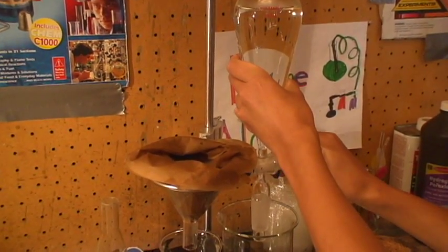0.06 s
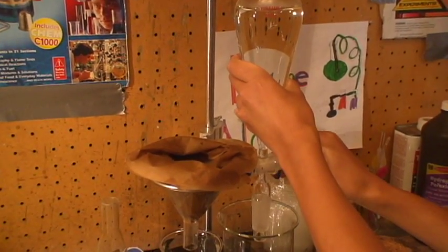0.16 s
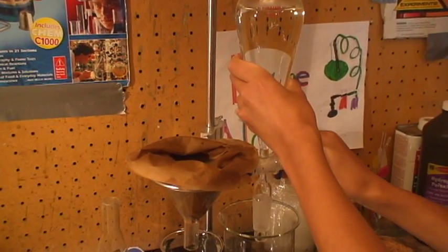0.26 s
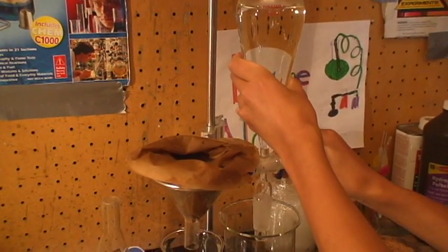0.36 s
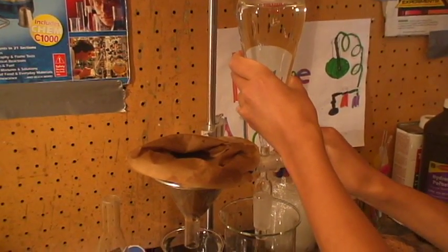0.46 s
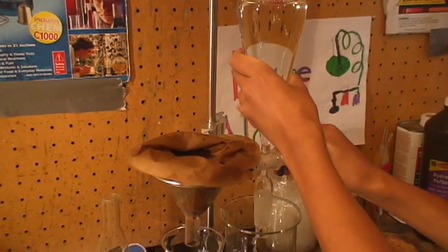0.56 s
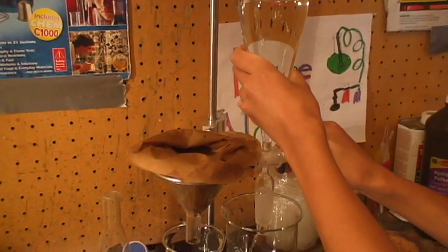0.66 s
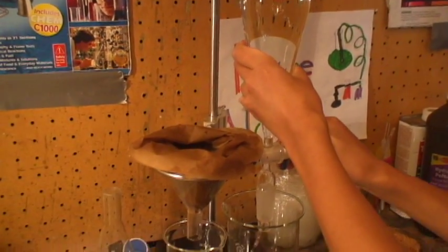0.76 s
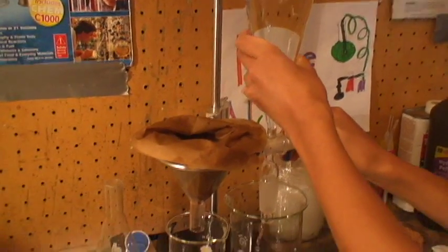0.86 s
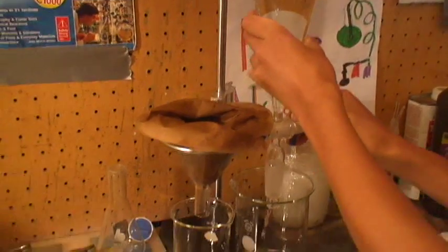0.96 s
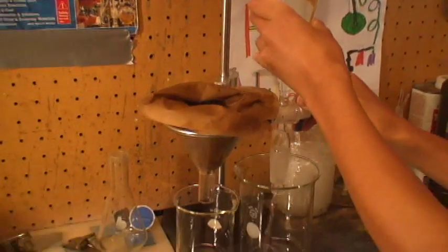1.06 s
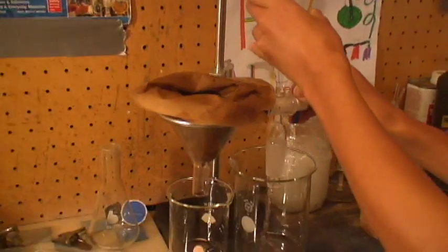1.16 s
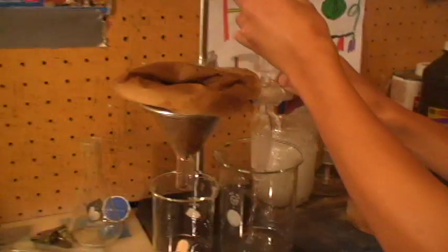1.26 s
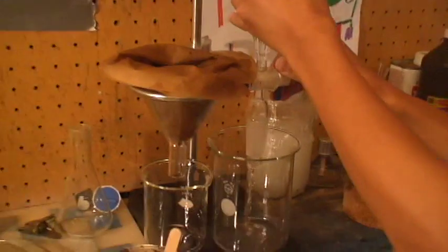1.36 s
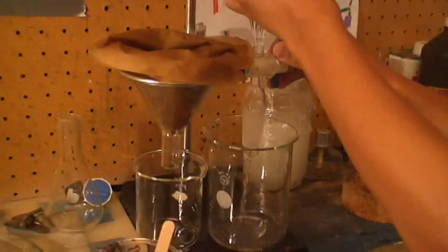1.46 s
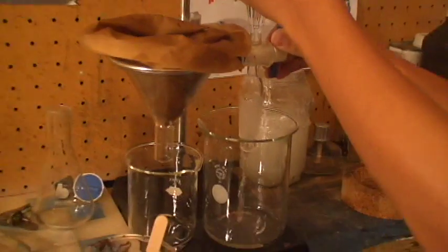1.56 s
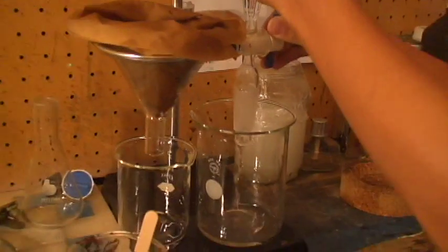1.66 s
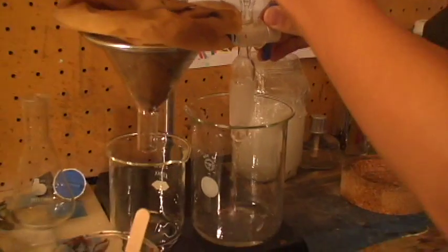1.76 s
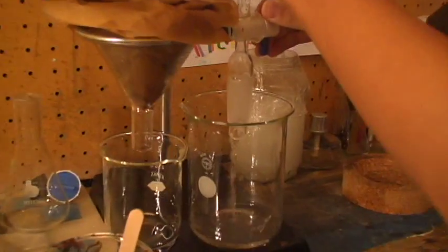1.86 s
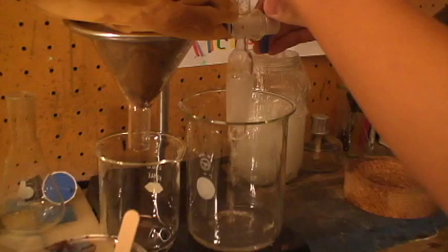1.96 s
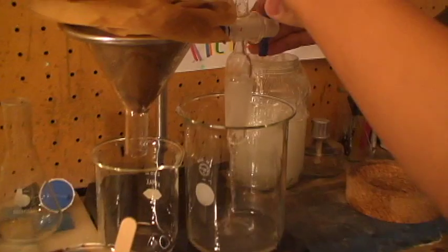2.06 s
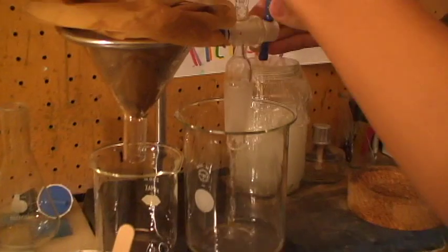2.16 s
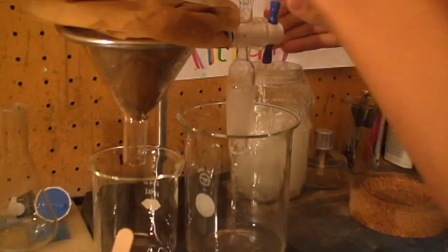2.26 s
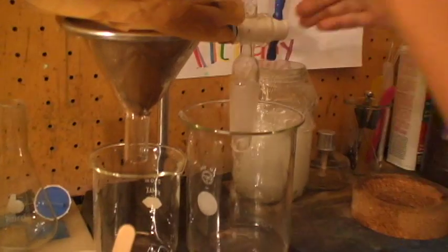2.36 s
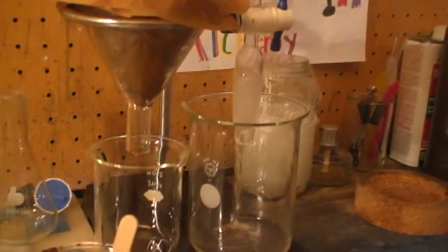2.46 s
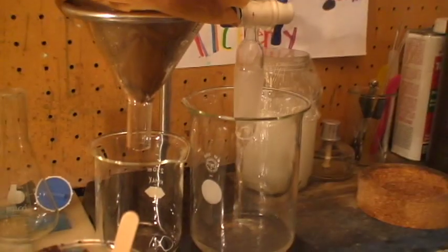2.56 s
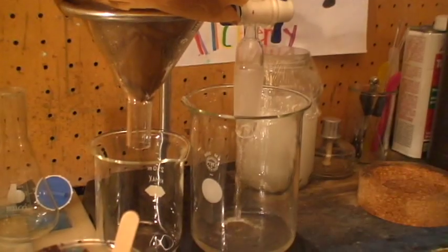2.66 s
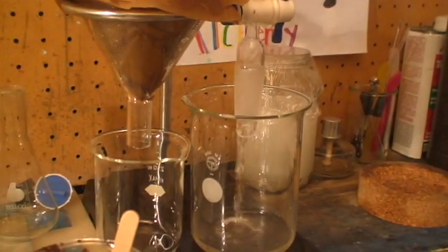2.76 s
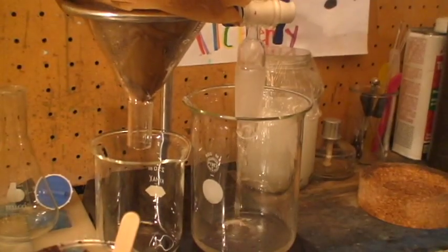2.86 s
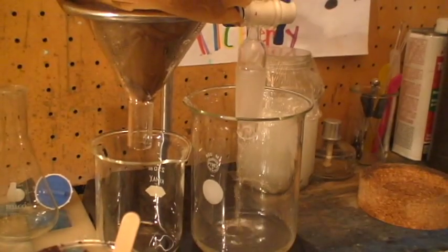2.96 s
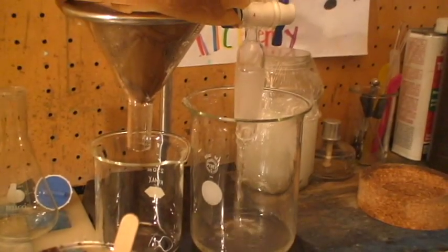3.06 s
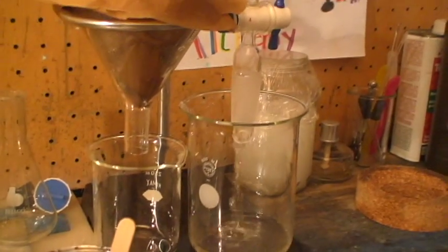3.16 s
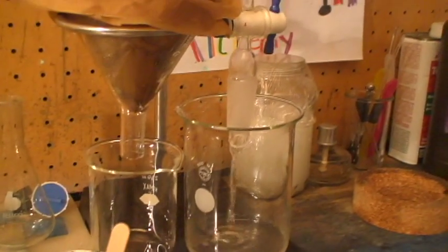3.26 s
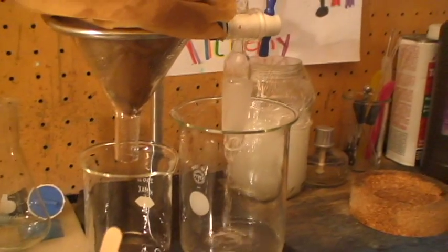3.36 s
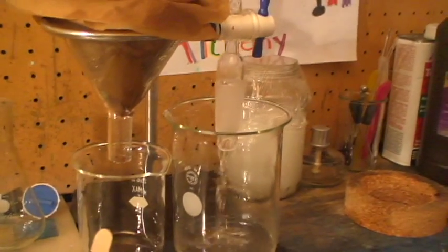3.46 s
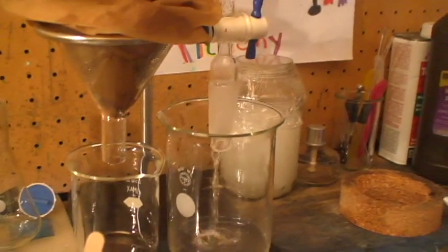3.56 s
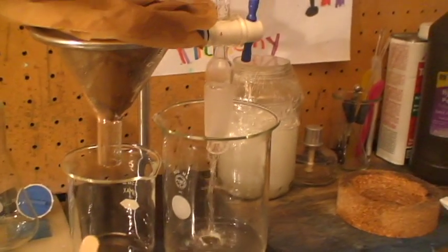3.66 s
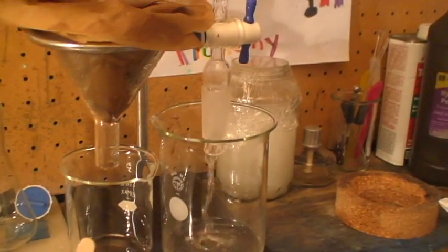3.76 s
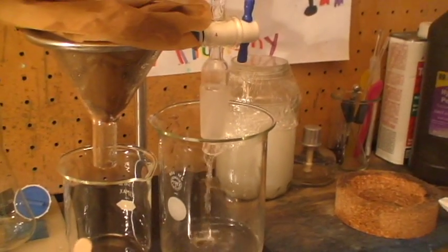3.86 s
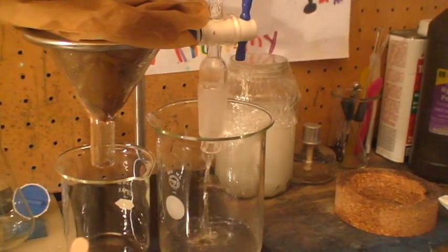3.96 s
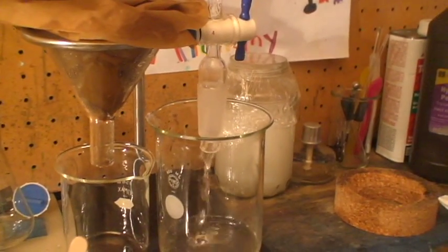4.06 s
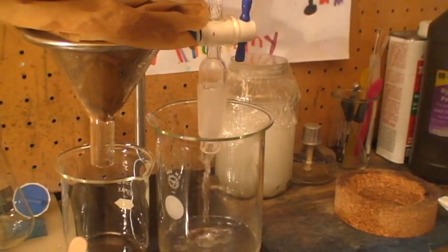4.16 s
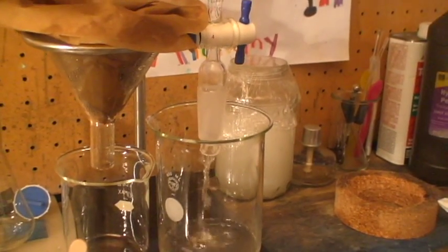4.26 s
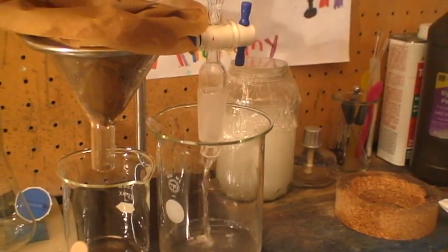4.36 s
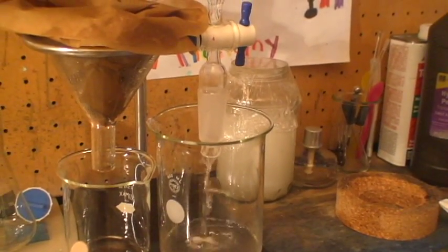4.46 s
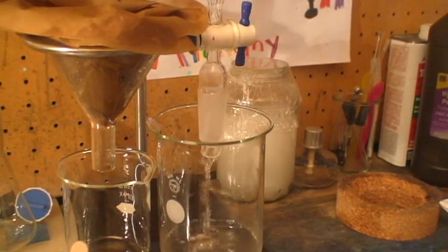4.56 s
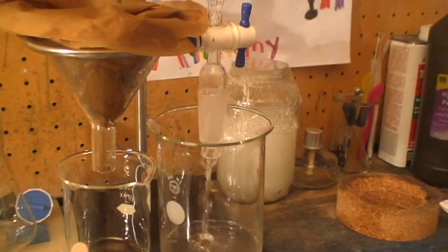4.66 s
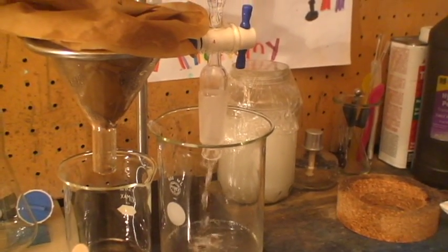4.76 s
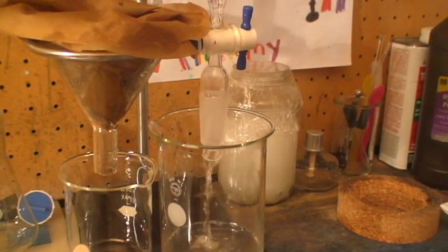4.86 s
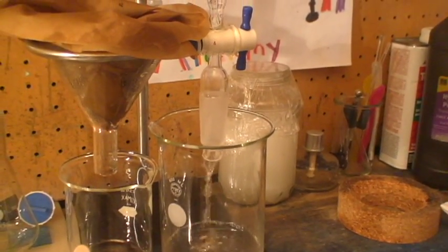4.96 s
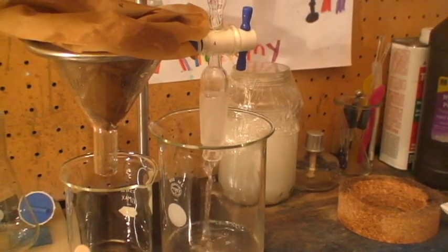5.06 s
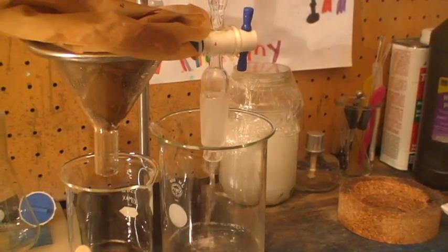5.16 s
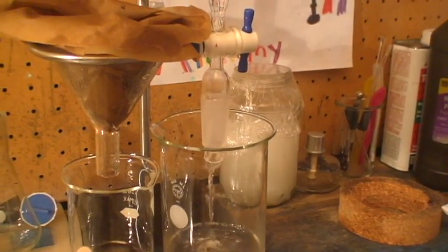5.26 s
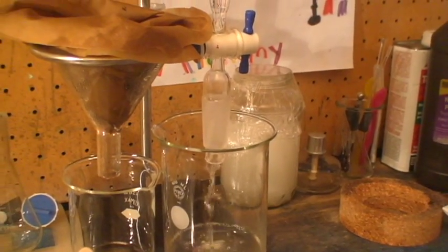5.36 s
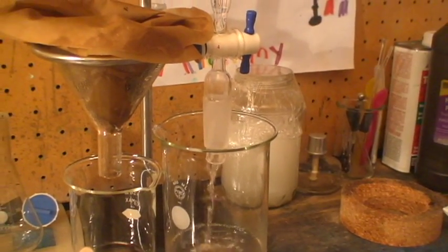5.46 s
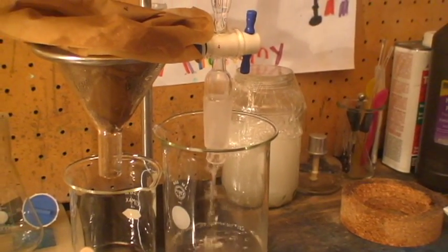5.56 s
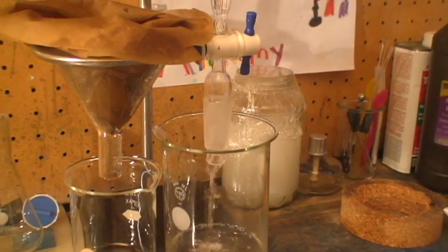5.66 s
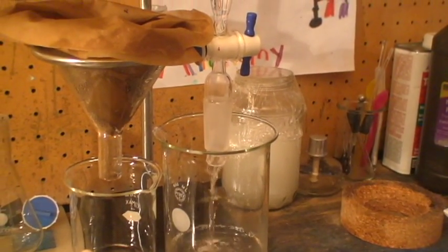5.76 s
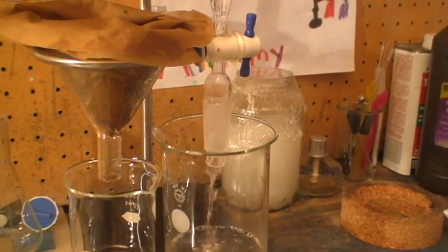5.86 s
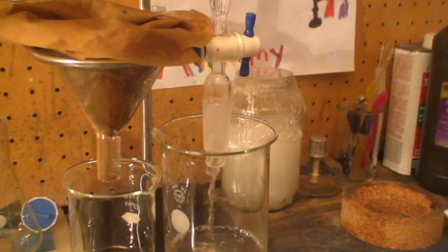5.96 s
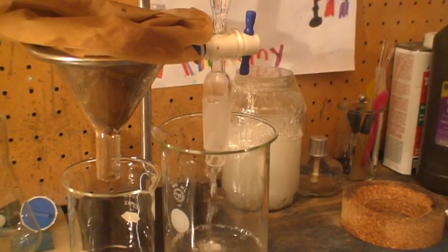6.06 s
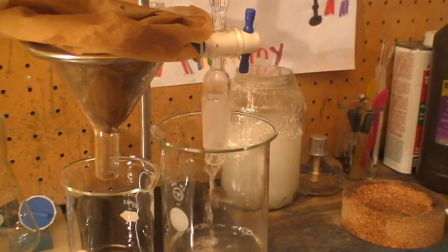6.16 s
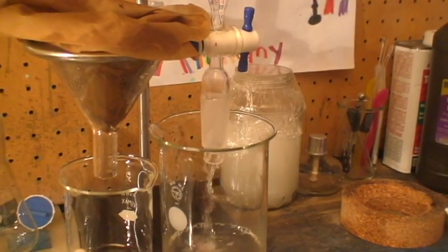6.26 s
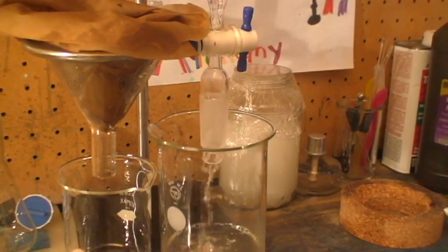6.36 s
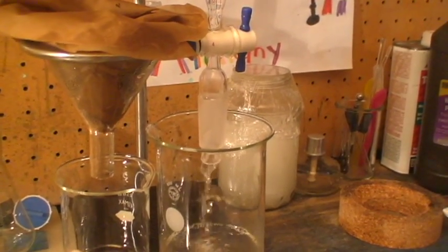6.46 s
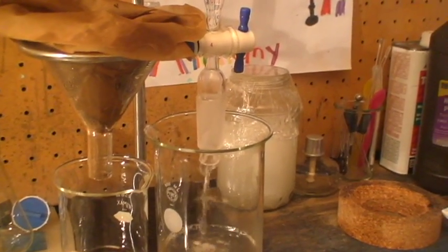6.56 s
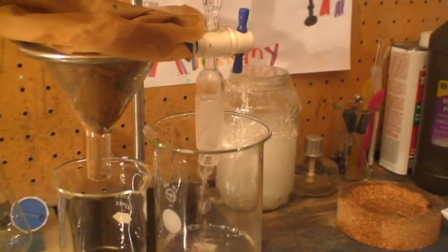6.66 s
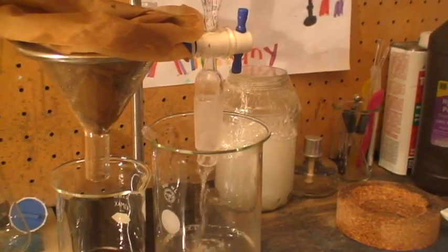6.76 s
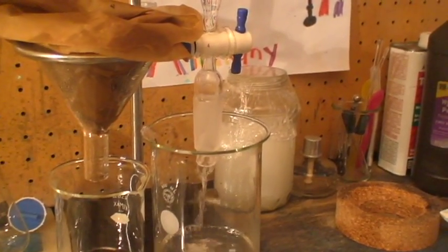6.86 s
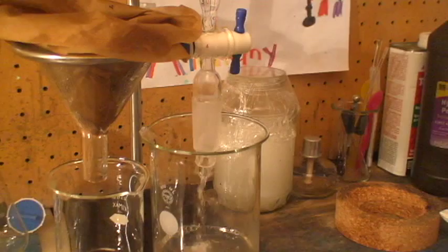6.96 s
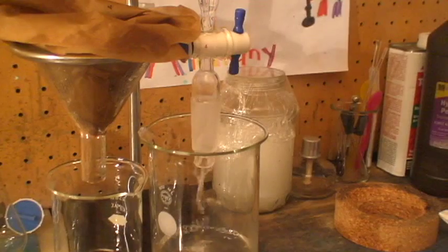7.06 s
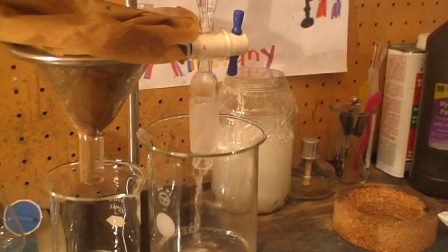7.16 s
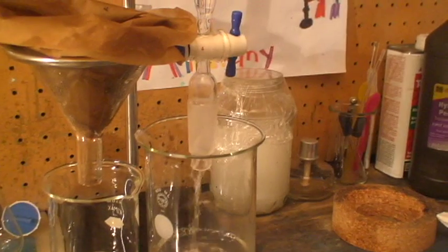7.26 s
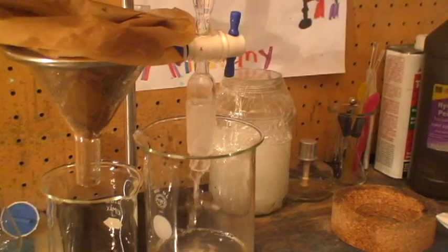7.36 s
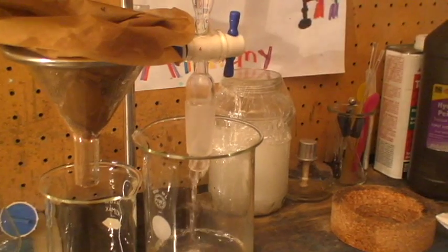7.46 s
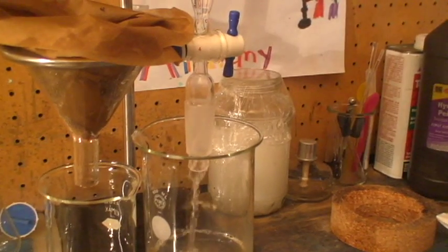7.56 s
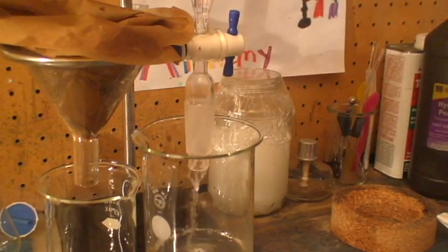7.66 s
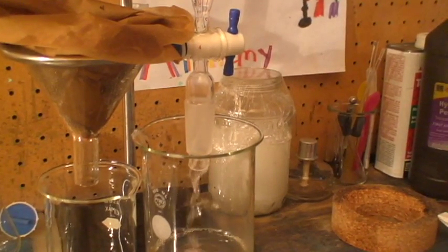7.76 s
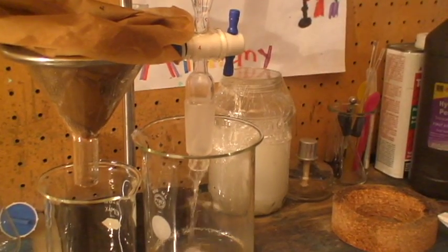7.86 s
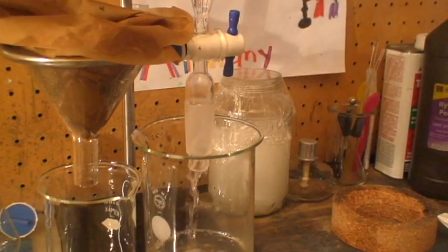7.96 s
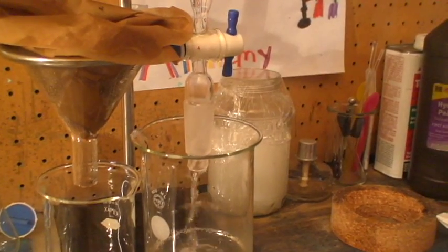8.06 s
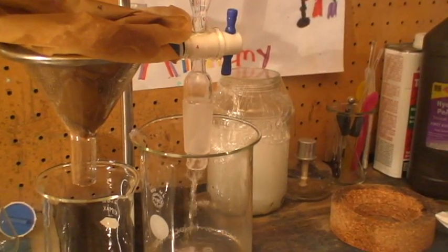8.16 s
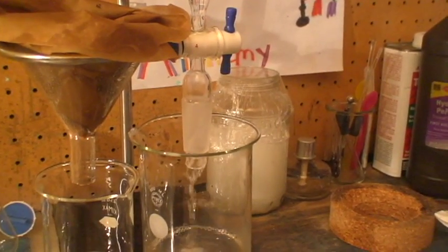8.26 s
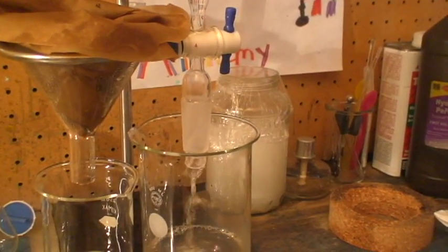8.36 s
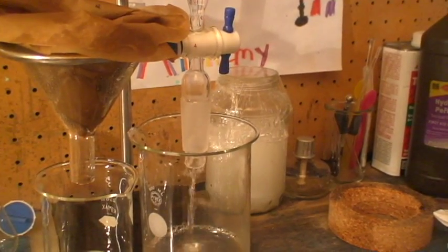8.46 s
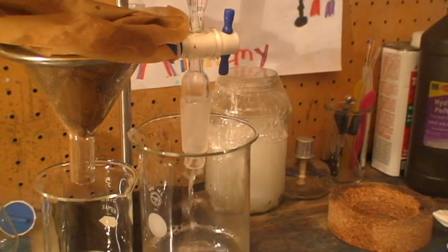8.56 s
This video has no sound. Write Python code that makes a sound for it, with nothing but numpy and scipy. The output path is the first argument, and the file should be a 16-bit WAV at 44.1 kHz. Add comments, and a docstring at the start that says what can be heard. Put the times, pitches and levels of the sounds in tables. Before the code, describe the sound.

Close and dry on a workbench: faint room hiss, thin glassy drips and light clicks at first, then faint glugs of air quickening in the funnel stem. A loud rattle of knocks at about four seconds precedes a steady bright trickle into the beaker, with rounded bubble plops, fine spray and glass ringing that sinks in pitch as it fills, easing towards the end.

```python
"""Liquid runs from a glass funnel through a stopcock into a glass beaker on a workbench in a small quiet room.
Single drops tick on bare glass as noise bursts with pings, then a broken stream sprays as noise puffs and grains.
It traps bubbles, sines that climb in pitch, in the deepening pool; decaying modes ring the beaker lower as it fills.
Air glugs up the funnel stem as a quickening beat of sines; hands knock the stand and bench in bursts and thuds.
Behind lie room reflections, coloured noise and two faint far whistles of narrow noise."""
import sys
import numpy as np
from scipy import signal
from scipy.fft import rfft, irfft
from scipy.io import wavfile

SR = 44100
rng = np.random.default_rng(int(sys.argv[2]) if len(sys.argv) > 2 else 0)


def materialize(psi):
    """Save the field psi as 16-bit PCM at rate SR to the path in sys.argv[1].

    A 1-D psi becomes a single channel; in a 2-D psi each row is a channel.
    """
    bounded = np.clip(np.atleast_2d(psi).T, -1, 1)
    quanta = np.round(bounded * 32767).astype(np.int16)
    wavfile.write(sys.argv[1], SR, quanta)


N = 380583

# room air and microphone hiss, spectral shape: (frequency [Hz], density [dB per Hz, relative])
FLOOR_SHAPE = [(12, -22), (20, -8), (116, -0.5), (142, -10.5), (319, -4), (499, -16.5), (542, -7.5),
               (642, -11.5), (1120, -11), (1330, -16.5), (1960, -17.5), (4300, -26), (6180, -27.5),
               (8650, -24.5), (16000, -41)]
# stereo width of that noise: (frequency [Hz], side minus mid [dB])
FLOOR_WIDTH = [(30, -28), (150, -9), (1000, 0), (12000, -2.5)]
FLOOR_DB = -50.5   # rms of the mid
HISS_HZ, HISS_HALF_WIDTH_HZ, HISS_DB = 5900, 970, -1.3   # a narrow rise in the hiss; dB re the hiss there
ROOM_T60_S, ROOM_DB, ROOM_SIDE_DB, WALL_CUT_HZ = 0.11, -8.5, -4, 16500
CUTOFF_HZ = 16500

# faint far whistles: (time [s], length [s], pitch [Hz], level at the crest [dB])
FAR_WHISTLES = [(0.772, 0.14, 4050, -53.5), (2.321, 0.17, 3780, -52.5)]
# knocks on stand and bench: (time [s], level [dB], centre [Hz], body t60 [s])
BENCH_KNOCKS = [(1.175, -26, 1130, 0.014), (1.185, -20, 1240, 0.017), (1.224, -34, 533, 0.061),
                (2.8401, -20, 598, 0.03), (3.901, -34.5, 495, 0.45), (3.929, -21, 4380, 0.036),
                (3.982, -15.5, 1162, 0.1), (4.015, -16.5, 2060, 0.021), (4.031, -19.5, 2660, 0.026),
                (4.107, -2.5, 1345, 0.061), (4.126, -10, 1110, 0.14), (4.132, -13.5, 743, 0.1),
                (4.177, -24, 910, 0.14)]
KNOCK_RING_T60_S, THUD_DB = 0.048, -13.5   # thud re the knock

GLUG_HZ, GLUG_T60_S, GLUG_DB, GLUG_LOSS_DB = 1110, 0.03, -29, .7   # loss per glug
# gap after glug k = base + extra * shrink^k - hurry * k
GLUG_START_S, GLUG_GAP_S, GLUG_EXTRA_S, GLUG_SHRINK, GLUG_HURRY_S = 3.3333, .12515, .08165, .6783, .001307

# the filling: (time [s], lowest beaker mode [Hz], spray level [dB], fine droplets' blows on the glass [dB])
FILLING = [(0, 3330, -78.5, -95), (.85, 3220, -69, -76), (.95, 3210, -63, -59.5), (1.6, 3130, -68, -58),
           (2.25, 3053, -68, -57), (2.5, 2960, -65, -82), (2.8, 2850, -54, -64), (3.2, 2818, -45.5, -55),
           (3.9, 2696, -44, -60), (4.6, 2577, -47, -54.5), (5.3, 2555, -42.5, -57.5),
           (6.0, 2450, -43.5, -59), (7.0, 2150, -46.5, -55), (7.8, 2090, -50.5, -60),
           (8.63, 2130, -50, -67)]
# higher beaker modes: (pitch at the start [Hz], level [dB], t60 [s], exponent on the lowest mode's sinking [1])
HIGHER_MODES = [(6100, -7, 0.045, 0.112), (9600, -3, 0.037, 0.62), (12900, 2.5, 0.016, 1.3),
                (13800, -15, 0.054, 0.18)]
LOWEST_T60_S, MODE_SPREAD_DB = 0.052, 11.5   # each blow strikes each higher mode with a strength of its own
# a drop's blow on the beaker re its own level, falling steadily as the pool cushions it, scattered by chance
STRIKE_DB, CUSHION_DB_PER_S, STRIKE_SPREAD_DB = -14.5, -0.5, 10

# the loudest air bubbles trapped under the stream: (time [s], level [dB], pitch [Hz])
TRAPPED_BUBBLES = [(4.28, -27, 1700), (4.465, -20.5, 1950), (4.532, -36, 2580), (4.611, -43, 2600),
                   (4.64, -18, 2070), (4.675, -18.5, 2490), (4.772, -25.5, 2530), (4.86, -26, 2510),
                   (5.036, -19, 1900), (5.112, -22.5, 2020), (5.17, -22.5, 1970), (5.327, -19.5, 2390),
                   (5.379, -21, 2050), (5.51, -17.5, 2560), (5.55, -24, 2530), (5.57, -14, 1990),
                   (5.669, -16, 1983), (5.705, -38, 2470), (5.758, -27.5, 2380), (5.889, -19.5, 1940),
                   (5.923, -12.5, 2000), (5.972, -10.5, 1900), (6.015, -17.5, 1510), (6.048, -18, 2294),
                   (6.105, -19.5, 2430), (6.154, -13, 1900), (6.205, -14, 1840), (6.225, -11, 1920),
                   (6.253, -18, 1660), (6.435, -21, 2330), (6.504, -15.5, 2035), (6.577, -25.5, 2140),
                   (6.605, -13, 1700), (6.641, -12.5, 1886), (6.667, -16, 1820), (6.729, -21.5, 2140),
                   (6.779, -22.5, 1640), (6.8, -9.5, 1740), (6.887, -12, 1970), (6.923, -18, 2250),
                   (6.968, -26.5, 2000), (7.053, -24.5, 1500), (7.104, -17.5, 1720), (7.19, -33, 2090),
                   (7.274, -17, 1990), (7.305, -24.5, 1450), (7.38, -17, 2070), (7.431, -27, 2170),
                   (7.451, -21, 960), (7.568, -29.5, 1930), (7.626, -22, 1470), (7.667, -26, 1430),
                   (7.725, -24, 1990), (7.876, -22.5, 1034), (7.969, -20.5, 1110), (8.005, -23.5, 1375),
                   (8.131, -27.5, 1900), (8.203, -31, 2130), (8.226, -27, 1480), (8.243, -20, 2120),
                   (8.278, -17, 768), (8.345, -23, 1970), (8.419, -18, 857), (8.469, -14, 1465),
                   (8.503, -20.5, 882), (8.593, -21, 905)]
BUBBLE_CYCLES, CYCLES_SPREAD = 52, 0.32   # typical cycles to fall 60 dB; scatter of their logarithm
SHED_S, SHED_DB, SHED_OCTAVES = 0.022, -11, 0.29   # smaller bubble shed: scale of delay, level, scale of step up
# low gulps that sweep up as the cavity closes: (time [s], level [dB], first pitch [Hz], chirp as in chirp() [1])
LOW_GULPS = [(5.399, -25, 580, 2.3), (6.010, -27, 793, 2.3), (6.984, -27.5, 820, 0.069),
             (7.052, -27, 727, 0.74), (7.451, -27.5, 630, 1.4), (8.299, -34, 804, 0.044),
             (8.433, -20.5, 880, 1.2)]
GULP_T60_S = .068

# dripping turns into a stream between these times; mean rate of stray drops before and after
STREAM_S, DRIP_PER_S, STREAM_PER_S = (2, 4.2), 41, 115
CLUMP_HZ, CLUMP_DB = 9.0, 3.0   # the stream breaks up in clumps: top speed and rms swing of the stray rate
SPRAY_T60_S = 0.027
POOL_S, GURGLE_DB, GURGLE_GROWS_S = 4.33, -39.5, 3.318   # gurgling starts with a pool and grows on this time scale

# the loudest drops bursting on glass or pool: (time [s], level [dB], centre [Hz])
LOUD_DROPS = [(0.6876, -36.5, 9900), (0.986, -20.5, 10020), (1.0813, -22.5, 12040), (1.1845, -30.5, 8800),
              (1.2523, -16, 6080), (1.621, -23, 12050), (1.9982, -26.5, 11400), (2.146, -25.5, 11100),
              (2.4159, -24.5, 13400), (2.8402, -32.5, 10700), (2.9206, -30.5, 10930),
              (3.2739, -23.5, 11860), (3.3162, -20, 8630), (3.4416, -28.5, 12900), (3.4668, -28.5, 5970),
              (3.596, -21.5, 5960), (3.7256, -29, 5960), (3.8679, -24.5, 6800), (3.9288, -11, 4406),
              (4.012, -30, 4020), (4.0854, -21, 7850), (4.1067, -12.5, 3500), (4.1575, -26, 7920),
              (4.2222, -16, 9650), (4.3266, -26.5, 5960), (4.3652, -13, 8300), (4.5324, -16, 8660),
              (4.5793, -21.5, 6800), (4.6067, -7.5, 8440), (4.7722, -24, 4410), (4.8599, -30, 13300),
              (4.8803, -22, 11600), (4.928, -27.5, 7800), (4.9558, -22.5, 4990), (4.9852, -19.5, 7230),
              (5.0204, -19.5, 7050), (5.0875, -17, 8380), (5.1685, -25, 13300), (5.2115, -16.5, 9120),
              (5.2579, -18.5, 5880), (5.3272, -17.5, 4680), (5.378, -13, 8600), (5.485, -16.5, 11350),
              (5.5319, -19.5, 11460), (5.551, -19, 5750), (5.573, -15.5, 7770), (5.6583, -16.5, 5170),
              (5.705, -19, 4280), (5.7663, -26, 11140), (5.791, -15.5, 8420), (5.85, -18, 9000),
              (5.97, -25.5, 4380), (6.046, -18, 8970), (6.1536, -16.5, 11100), (6.2536, -22, 4040),
              (6.4311, -16, 7310), (6.469, -21, 9040), (6.5533, -26, 13200), (6.6665, -18, 8830),
              (6.7595, -20, 9500), (6.857, -31, 8900), (6.908, -16, 6520), (7.0973, -20.5, 9140),
              (7.1484, -25, 6810), (7.2976, -24.5, 11300), (7.351, -27, 13100), (7.431, -21.5, 9020),
              (7.6657, -22.5, 5360), (7.8288, -21.5, 6460), (7.8948, -25, 6770), (7.994, -25, 5420),
              (8.0453, -25, 7750), (8.156, -26, 8630), (8.225, -18.5, 7820), (8.244, -18.5, 3850),
              (8.3002, -22.5, 3820), (8.3617, -20, 8840), (8.4191, -25.5, 3890), (8.5295, -24, 13300),
              (8.5812, -33, 10900)]
TICK_T60_S, PING_T60_S = 0.014, 0.036
STEM_HZ, STEM_DB, STEM_T60_S = 5960, -20.5, 0.19   # a mode of the funnel stem, which stays out of the pool


def amp(db):
    """Gain of a level in dB."""
    return 10 ** (np.asarray(db) / 20)


def rms_one(x):
    """Scale to rms 1."""
    return x / np.sqrt(np.mean(x ** 2) + 1e-20)


def butter(x, order, hz, kind="low"):
    """Butterworth filter, low-pass unless told otherwise."""
    return signal.sosfilt(signal.butter(order, hz, kind, fs=SR, output="sos"), x)


def octave_band(x, order, hz, octaves):
    """Band-pass this many octaves wide around hz."""
    edges = np.clip(hz * 2 ** (np.array([-.5, .5]) * octaves), 30, .45 * SR)
    return butter(x, order, edges, "band")


def add(out, s, sound):
    """Mix a short sound in at time s."""
    i = int(round(s * SR))
    out[i:i + len(sound)] += sound[:max(N - i, 0)]


def fade(t60):
    """Time axis and exponential decay by 60 dB in t60 seconds."""
    t = np.arange(int(max(t60, .008) * SR)) / SR
    return t, amp(-60 * t / max(t60, .003))


def die_away(clicks, t60):
    """Give each click an exponential tail; the tiny offset keeps the filter off vanishing numbers."""
    return signal.lfilter([1], [1, -amp(-60 / (t60 * SR))], clicks + 1e-18)


def ring(clicks, hz, t60):
    """A mode of moving pitch: shift the clicks down by its phase, let them die away, shift back."""
    turn = np.exp(2j * np.pi * np.cumsum(hz * np.ones(N)) / SR)
    return np.imag(turn * die_away(clicks / turn, t60))


def burst(hz, t60, octaves, crack_db):
    """A sharp click with dying noise behind it, through a band around hz; early peak 1."""
    t, decay = fade(t60)
    push = rng.standard_normal(len(t)) * decay
    push[0] = amp(crack_db)
    sound = octave_band(push, 3, hz, octaves)
    return sound / np.abs(sound[:300]).max()


def chirp(hz, t60, rise):
    """A dying sine that swells in about a cycle; its pitch climbs to 1 + 2 * rise times hz, or holds at rise 0."""
    t, decay = fade(t60)
    sine = np.sin(2 * np.pi * hz * t * (1 + rise * np.minimum(t, t60) / t60))
    return sine * decay * (1 - np.exp(-t * hz * 2))


def strays(per_s, spread_db):
    """Random clicks of uneven size and either sign."""
    hits = rng.random(N) < per_s / SR
    size = amp(spread_db * np.minimum(rng.exponential(1, N), 2.5))
    return hits * size * rng.choice([-1, 1], N)


def grains(clicks, low_hz, high_hz, cycles, count):
    """Clicks dealt to resonators spread in pitch, each dying by 60 dB in the given cycles."""
    dealt, out = rng.integers(0, count, N), 0
    for k, hz in enumerate(np.geomspace(low_hz, high_hz, count)):
        r, w = amp(-60 * hz / (cycles * SR)), 2 * np.pi * hz / SR
        resonator = [1, -2 * r * np.cos(w), r * r]
        out = out + signal.lfilter([np.sin(w)], resonator, clicks * (dealt == k) + 1e-18)
    return out


def puffs(clicks, low_hz, high_hz, t60, octaves, count):
    """Clicks dealt to bands spread in pitch; each opens a short dying puff of noise in its band."""
    dealt, out, white = rng.integers(0, count, N), 0, rng.standard_normal(N)
    for k, hz in enumerate(np.geomspace(low_hz, high_hz, count)):
        opening = die_away(np.abs(clicks) * (dealt == k), t60)
        out = out + rms_one(octave_band(white, 2, hz, octaves)) * opening
    return out


def floor():
    """Room air and hiss: steady coloured noise, partly its own in each channel."""
    hz = np.maximum(np.fft.rfftfreq(N, 1 / SR), 1)
    shape_hz, shape_db = np.transpose(FLOOR_SHAPE)
    width_hz, width_db = np.transpose(FLOOR_WIDTH)
    shape = amp(np.interp(np.log(hz), np.log(shape_hz), shape_db))
    width = amp(np.interp(np.log(hz), np.log(width_hz), width_db))
    shape *= 1 + amp(HISS_DB) / (1 + ((hz - HISS_HZ) / HISS_HALF_WIDTH_HZ) ** 2)
    mid, side = rfft(rng.standard_normal((2, N))) * shape
    mid, side = irfft(mid, N), irfft(side * width, N)
    return amp(FLOOR_DB) * np.array([mid + side, mid - side]) / np.std(mid)


def whistles():
    """Narrow noise that swells and fades."""
    out = np.zeros(N)
    for s, length, hz, db in FAR_WHISTLES:
        swell = np.hanning(int(length * SR))
        narrow = butter(rng.standard_normal(len(swell)), 2, [hz - 200, hz + 200], "band")
        add(out, s, amp(db) * swell * rms_one(narrow))
    return out


def room(x):
    """Dense reflections from bench, glassware and walls: dying noise, unlike in the two channels."""
    t, decay = fade(ROOM_T60_S)
    tails = rng.standard_normal((2, len(t))) * decay * (t > .001)
    tails = butter(tails, 1, WALL_CUT_HZ)
    mid, side = (signal.fftconvolve(x, h / np.sqrt(np.sum(h ** 2)))[:N] for h in tails)
    return amp(ROOM_DB) * (mid + amp(ROOM_SIDE_DB) * side * np.array([[1], [-1]]))


def knocks():
    """A sharp contact, a short body ring and a low thud of the bench."""
    out = np.zeros(N)
    for s, db, hz, t60 in BENCH_KNOCKS:
        add(out, s, amp(db - 2.0) * burst(2700, 0.0076, octaves=1.48, crack_db=24))   # contact
        add(out, s, amp(db) * burst(hz, t60, octaves=1.3, crack_db=19))               # body
        add(out, s, amp(db - 9) * chirp(hz, KNOCK_RING_T60_S, rise=0))
        add(out, s, amp(db - 35) * chirp(53, 0.23, rise=0))                           # the bench sways
        add(out, s, amp(db + THUD_DB) * burst(330, 2.9 * t60, octaves=3.17, crack_db=23.5))
    return out


def glugs(count=22):
    """Air bubbles up the stem in a weakening beat that quickens fast, then slowly."""
    out, s = np.zeros(N), GLUG_START_S
    for k in range(count):
        add(out, s, amp(GLUG_DB - GLUG_LOSS_DB * k) * chirp(GLUG_HZ, GLUG_T60_S, rise=0.049))
        s += GLUG_GAP_S + GLUG_EXTRA_S * GLUG_SHRINK ** k - GLUG_HURRY_S * k
    return out


def beaker(lowest_hz, blows):
    """Drops strike the glass; the liquid's mass lowers every mode and deadens the high ones."""
    s, db, _ = np.transpose(LOUD_DROPS)
    chance_db = STRIKE_SPREAD_DB * rng.uniform(-1.4, 1, len(s))
    clicks = blows.copy()
    clicks[(s * SR).astype(int)] += amp(db + STRIKE_DB + CUSHION_DB_PER_S * s + chance_db)
    out = ring(clicks, lowest_hz, LOWEST_T60_S)
    sunk = lowest_hz / lowest_hz[0]
    for hz, db, t60, exponent in HIGHER_MODES:
        struck = clicks * amp(MODE_SPREAD_DB * rng.uniform(-2.7, 1, N))
        out += amp(db) * sunk ** 1.1 * ring(struck, hz * sunk ** exponent, t60)
    return out


def pool():
    """Bubbles and gulps in the beaker, each bubble with its splash and a smaller one shed."""
    out, chance = np.zeros(N), rng.normal(0, 1, (len(TRAPPED_BUBBLES), 4))
    for (s, db, hz), (a, b, c, d) in zip(TRAPPED_BUBBLES, chance):
        t60 = BUBBLE_CYCLES * np.exp(CYCLES_SPREAD * a) / hz
        add(out, s, amp(db) * chirp(hz, t60, rise=0.093 * abs(b)))
        add(out, s, amp(db - 5) * burst(hz, 1.8 * t60, octaves=.75, crack_db=10))   # splash
        add(out, s, amp(db - 26) * burst(400, 0.038, octaves=1.8, crack_db=-2))     # the pool slaps the glass
        shed = chirp(hz * 2 ** (SHED_OCTAVES * abs(d)), t60, rise=.35 * abs(a))
        add(out, s + SHED_S * (.5 + abs(c)), amp(db + SHED_DB) * shed)
    for s, db, hz, rise in LOW_GULPS:
        add(out, s, amp(db + 2.5) * burst(1.58 * hz, GULP_T60_S, octaves=1.4, crack_db=2))
        add(out, s, amp(db) * chirp(hz, GULP_T60_S, rise))
    return out


def gurgle(t, per_s):
    """Crowds of small bubbles, as resonant grains and froth puffs, that grow once a pool stands."""
    blips = strays(4 * per_s, spread_db=6.0)
    froth = amp(-5.5) * rms_one(puffs(blips, 543, 3100, 0.033, octaves=1.0, count=6))
    blips = rms_one(grains(blips, 1098, 2470, cycles=22.0, count=10))
    depth = np.tanh(np.maximum(t - POOL_S, 0) / GURGLE_GROWS_S) ** 2
    return amp(GURGLE_DB) * depth * (blips + froth)


def clumps():
    """Slow random swing of a rate, mean 1."""
    swing = amp(CLUMP_DB * rms_one(butter(rng.standard_normal(N), 2, CLUMP_HZ)))
    return swing / np.mean(swing)


def trickle():
    """The stream's wash under the drops, flickering fast; rms 1."""
    wash = butter(rng.standard_normal(N), 2, [2800, 13000], "band")
    flicker_db = 6.0 * rms_one(butter(rng.standard_normal(N), 2, 25))
    return rms_one(wash * amp(flicker_db))


def spray(stray, spray_db, lowest_hz):
    """Stray drops as puffs and grains over the wash: thin on bare glass, fuller on a pool."""
    full = rms_one(puffs(stray, 5070, 15700, SPRAY_T60_S, octaves=0.52, count=8))
    full += amp(-4) * rms_one(grains(stray, 3800, 14400, cycles=140, count=16))
    full += amp(-13) * trickle()
    full *= amp(spray_db)
    thin = butter(full, 4, 8000, "high")
    pooled = np.clip((2900 - lowest_hz) / 250, 0, 1)   # a lower beaker mode means a deeper pool
    return pooled * full + (1 - pooled) * thin


def drops():
    """Each drop is a bright burst; its droplets ping at and near its pitch, and may set the stem ringing."""
    out, chance = np.zeros(N), rng.normal(0, 1, (len(LOUD_DROPS), 3))
    for (s, db, hz), (a, b, c) in zip(LOUD_DROPS, chance):
        add(out, s, amp(db) * burst(hz, TICK_T60_S, octaves=0.77, crack_db=12.5))
        add(out, s, amp(db - 11) * burst(3040, 0.015, octaves=2.1, crack_db=16.5))   # the dull tap of the impact
        add(out, s, amp(db - 5.5) * chirp(hz, PING_T60_S, rise=0.0029))
        droplet = chirp(hz * 2 ** (.2 * b), PING_T60_S, rise=.02)
        add(out, s + .004 * abs(c), amp(db - 14 + 2 * a) * droplet)
        off_pitch_db = -60.0 * abs(np.log2(hz / STEM_HZ))   # only drops near its pitch excite the stem
        add(out, s, amp(db + STEM_DB + off_pitch_db) * chirp(STEM_HZ, STEM_T60_S, rise=0))
    return out


def scene():
    """Bench sounds almost in the middle, with room, far whistles and floor."""
    t, (s, *columns) = np.arange(N) / SR, np.transpose(FILLING)
    lowest_hz, spray_db, blows_db = (np.interp(t, s, column) for column in columns)
    per_s = np.interp(t, STREAM_S, [DRIP_PER_S, STREAM_PER_S]) * clumps()
    stray = strays(per_s, spread_db=5.5)
    blows = amp(blows_db) * (stray + strays(2 * per_s, spread_db=4.0))
    bench = knocks() + glugs() + beaker(lowest_hz, blows) + pool() + gurgle(t, per_s)
    bench += spray(stray, spray_db, lowest_hz) + drops()
    return bench * amp([[.2], [-.2]]) + room(bench) + whistles() + floor()


def record(dry):
    """Cut the top steeply and clip at full scale."""
    return np.clip(signal.sosfilt(signal.cheby2(8, 50, CUTOFF_HZ, fs=SR, output="sos"), dry), -1, 1)


dry = scene()
out = record(dry)
materialize(out)
```